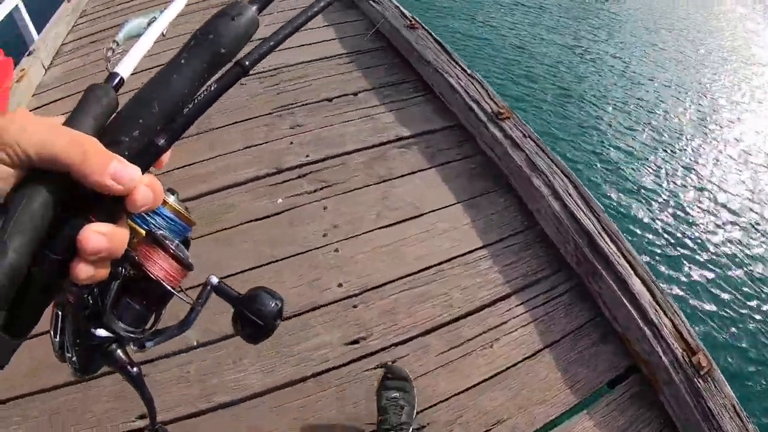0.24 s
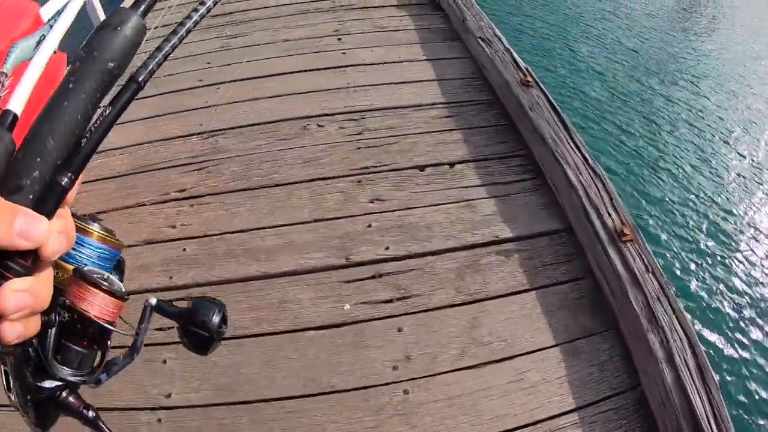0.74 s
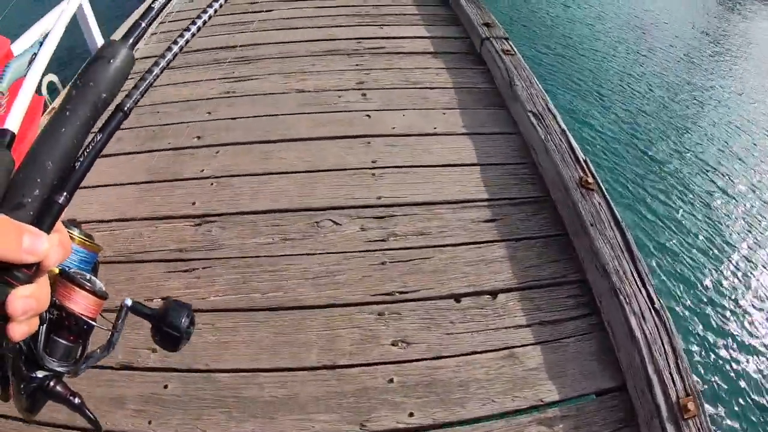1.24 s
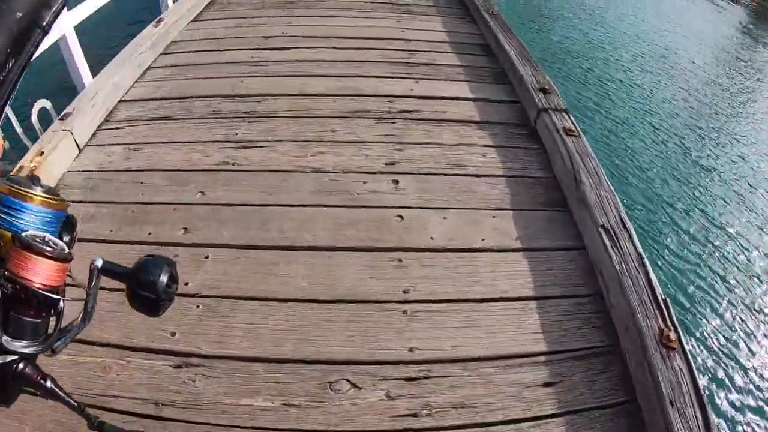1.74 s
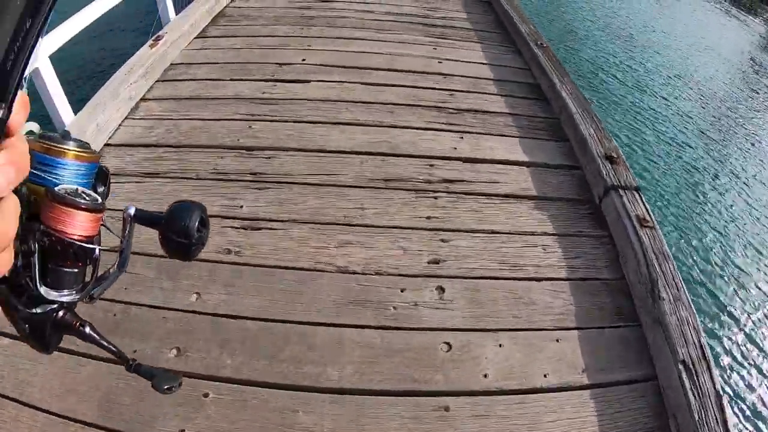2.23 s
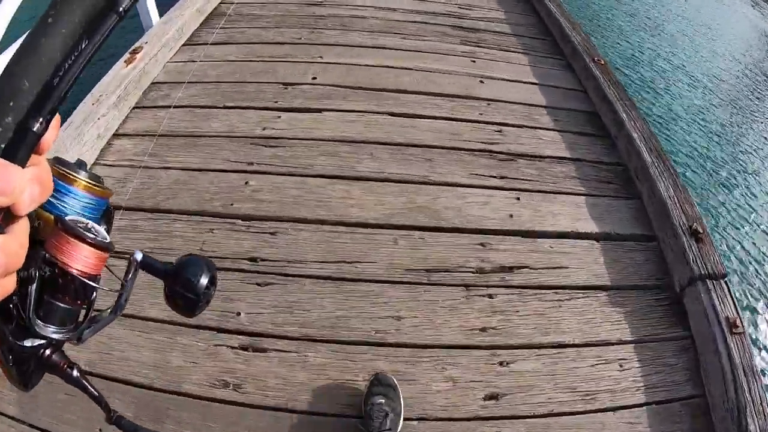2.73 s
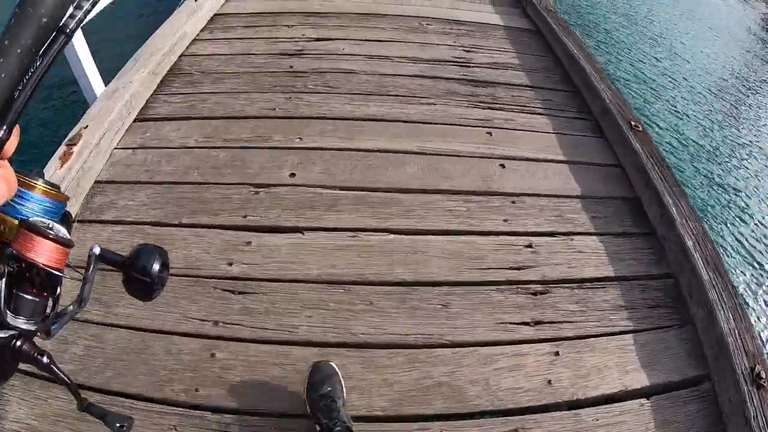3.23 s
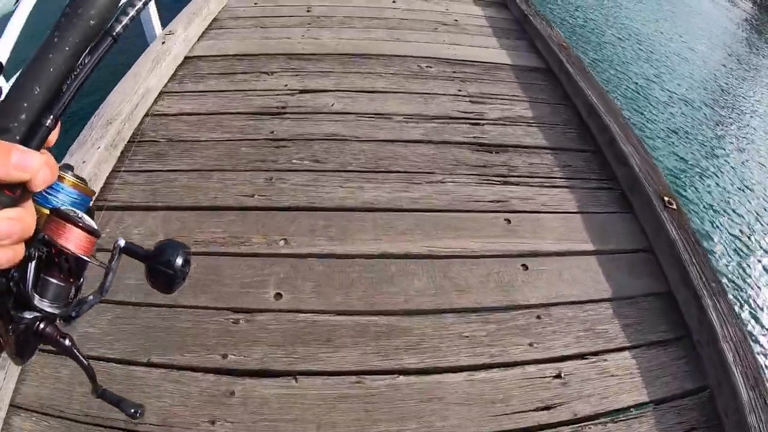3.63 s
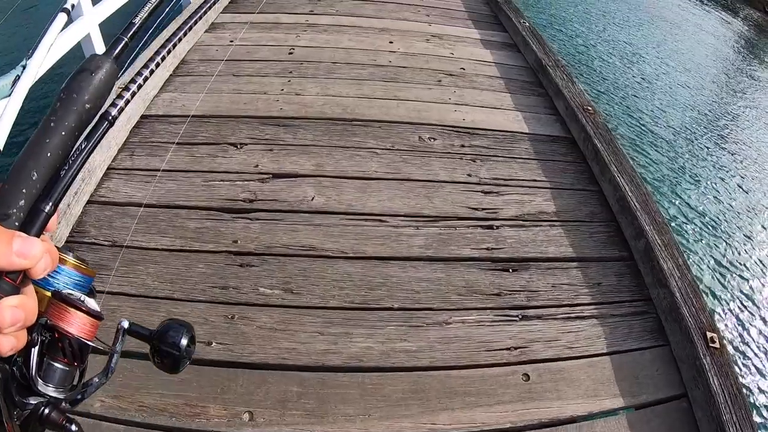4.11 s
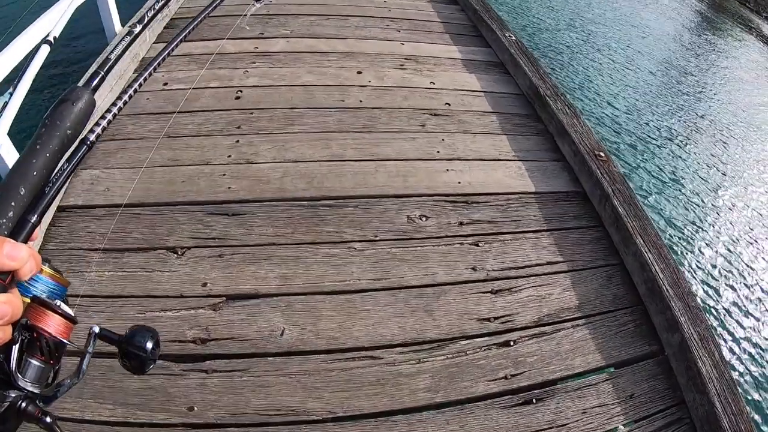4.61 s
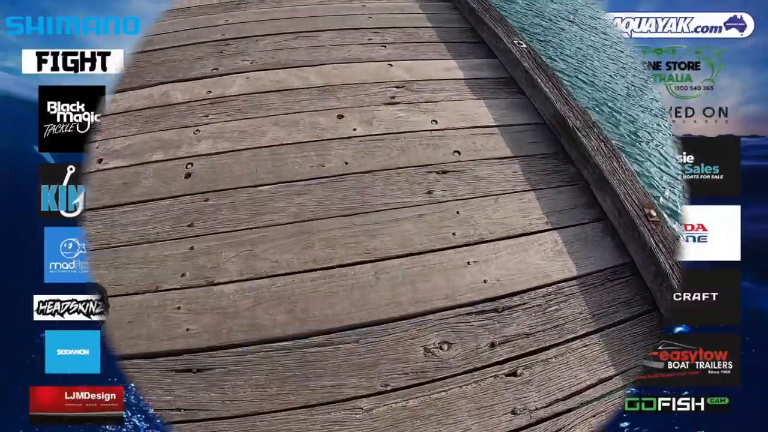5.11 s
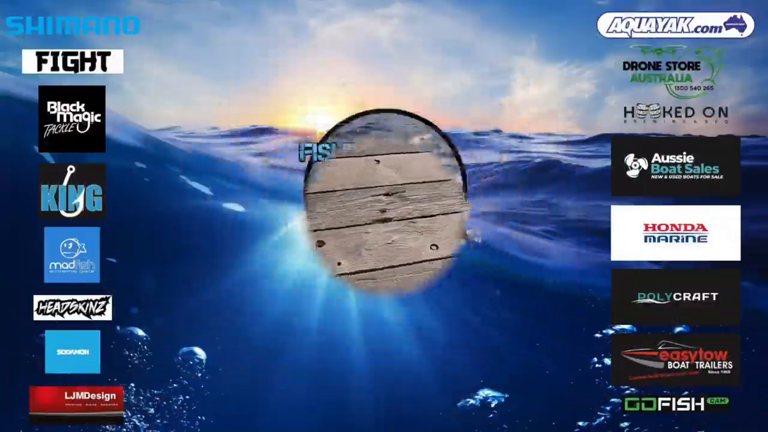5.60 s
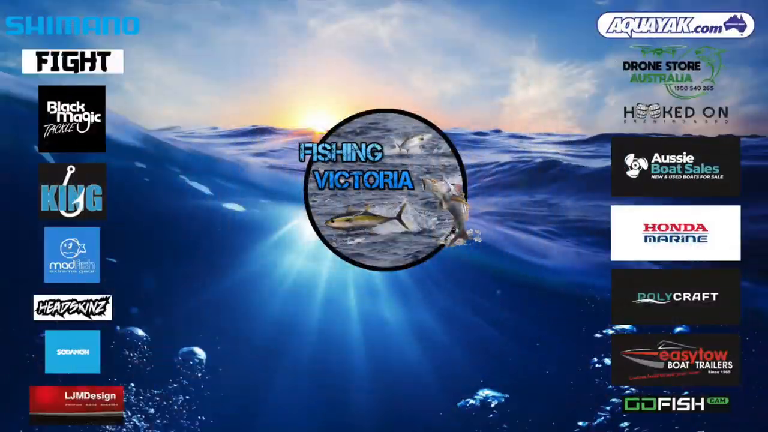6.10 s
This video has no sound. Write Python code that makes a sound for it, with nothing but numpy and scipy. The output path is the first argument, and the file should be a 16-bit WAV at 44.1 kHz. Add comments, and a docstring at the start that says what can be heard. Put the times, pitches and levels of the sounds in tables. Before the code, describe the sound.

Someone walks a wooden jetty: dull hollow knocks, rattling tackle, rubbing clothes and lumpy low wind, close to the body, fading at the end.

```python
"""Someone walks along a wooden jetty with rods and tackle, heard by two microphones worn on the body.
Steps and jolts thud as short deep swings of pressure and thump a hollow body, made of ringing sine waves.
Loose gear clacks and rattles as small blows ringing sets of modes; clothes rustle as coloured noise.
Wind buffets the microphones as lumpy low noise. The sound starts in stereo,
narrows to mono after the first second and fades out at the end."""
import sys
import numpy as np
from scipy import signal
from scipy.fft import rfft, irfft, next_fast_len
from scipy.io import wavfile
from scipy.ndimage import uniform_filter1d, minimum_filter1d, map_coordinates

SR = 44100
rng = np.random.default_rng(int(sys.argv[2]) if len(sys.argv) > 2 else 0)


def to_wav(sig):
    """Store sig (one row per channel, or 1-D mono) as 16-bit WAV at the path in sys.argv[1].

    Samples outside -1..1 are clipped; the rate is SR.
    """
    pcm = np.clip(np.atleast_2d(sig), -1, 1) * 32767
    pcm = np.round(pcm).astype(np.int16)
    wavfile.write(sys.argv[1], SR, pcm.T)  # frames by channels


N = 280035


def amp(db):
    """Turn dB into a gain."""
    return 10 ** (np.asarray(db) / 20)


def unit(x):
    """Scale a sound to an rms level of 1."""
    return x / np.sqrt(np.mean(x ** 2) + 1e-20)


def curves(rows):
    """Draw straight lines between table rows: one value per sample for each column after the time."""
    seconds, *columns = np.transpose(rows)
    return [np.interp(np.arange(N) / SR, seconds, column) for column in columns]


def wobble(rate):
    """Draw a smooth random curve through a given number of random points per second."""
    points = rng.standard_normal(int(N * rate / SR) + 4)
    return map_coordinates(points, [np.arange(N) * rate / SR])


def filtered(x, response):
    """Filter a sound: multiply its spectrum by a response that depends on frequency."""
    size = next_fast_len(N + SR // 2)
    spectrum = rfft(x, size) * response(np.fft.rfftfreq(size, 1 / SR))
    return irfft(spectrum, size)[..., :N]


def colour(points):
    """Make a gain curve over frequency from (Hz, dB) points on a log axis."""
    f, db = np.transpose(points)
    return lambda hz: amp(np.interp(np.log(hz + 1), np.log(f + 1), db))


def grit(response, grain_db, rate):
    """Make two separate noises that swell unevenly together, coloured, at rms 1."""
    grain = amp(grain_db * wobble(rate))
    return unit(filtered(grain * rng.standard_normal((2, N)), response))


def ports(pair, apart_db, lean):
    """Make left and right from a shared and an unshared part; a positive lean favours the left."""
    side = amp(apart_db) * pair[1] + lean * pair[0]
    return np.array([pair[0] + side, pair[0] - side])


def swells(steady_db, tops, tops_db, rise, fall):
    """Gain of a steady level plus swells, summed as powers; rise and fall are the seconds per 10 dB."""
    t = np.arange(N) / SR
    power = amp(steady_db) ** 2
    for s, db, up, down in np.broadcast(tops, tops_db, rise, fall):
        near = slice(max(0, round((s - 4 * up) * SR)), round((s + 4 * down) * SR))
        drop_db = 10 * np.maximum((s - t[near]) / up, (t[near] - s) / down)
        power[near] += amp(db - drop_db) ** 2
    return np.sqrt(power)


# Deep thuds. Each row: middle of the thud in seconds, level in dB, pitch in Hz.
THUD_HITS = [(0.276, -16.5, 81), (1.094, -11, 73.6), (1.682, -21.5, 81), (1.781, -20, 72),
             (1.834, -22, 112), (2.605, -26, 130), (2.649, -16, 132), (2.731, -14.5, 80.6),
             (2.876, -13, 66.4), (2.953, -14, 108), (3.29, -11.5, 86.4), (3.373, -12.5, 72),
             (3.467, -20, 80), (3.765, -18, 81.5), (3.863, -21, 75), (4.075, -13.5, 82),
             (4.235, -14.5, 114), (4.289, -15, 119), (4.387, -19, 75), (4.471, -17, 114),
             (4.648, -16, 88.7), (4.859, -14, 84), (5.259, -12.5, 110)]
THUD_SPREAD_S = 0.0067  # standard deviation of the bell-shaped swell


def thuds():
    """Soft heavy jolts travel through the body as a swing or two of deep pressure."""
    out = np.zeros(N + SR)
    t = np.arange(-SR // 20, SR // 20) / SR
    for s, db, hz in THUD_HITS:
        bell = np.exp(-.5 * (t / THUD_SPREAD_S) ** 2)
        swing = bell * np.sin(2 * np.pi * hz * t + rng.uniform(0, 2 * np.pi))
        out[round(s * SR) - SR // 20:][:len(t)] += amp(db) * swing
    return out[:N]


# Thumps on the hollow body.
# Each row: time in seconds, level in dB, pitch in Hz, time to die by 60 dB in seconds (held to 0.02-0.3).
THUMP_HITS = [(0.125, -25, 260, 0.053), (0.27, -19, 251, 0.088), (0.479, -12.5, 255, 0.092),
              (1.065, -4.5, 210, 0.025), (1.1, -10.5, 191, 0.08), (1.181, -17, 243, 0.059),
              (1.243, -10.5, 290, 0.038), (1.255, -13, 354, 0.061), (1.361, -16, 297, 0.076),
              (1.446, -16, 201, 0.063), (1.637, -9.5, 237, 0.063), (1.771, -18.5, 263, 0.1),
              (1.83, -5, 270, 0.055), (1.989, -14, 264, 0.093), (2.045, -15.5, 287, 0.13),
              (2.155, -9, 257.3, 0.096), (2.286, -3.5, 270, 0.04), (2.349, -14.5, 192.5, 0.11),
              (2.51, -19, 248, 0.15), (2.64, -11.5, 222, 0.045), (2.721, -17.5, 246, 0.11),
              (2.858, -12.5, 220.5, 0.13), (2.862, -8, 330, 0.054), (2.921, -9, 258, 0.065),
              (2.969, -13.5, 180.5, 0.15), (3.018, -21, 257, 0.032), (3.123, -27, 189, 0.032),
              (3.168, -20.5, 248, 0.2), (3.252, -5, 272, 0.021), (3.32, -12, 254, 0.11),
              (3.356, -13.5, 277, 0.058), (3.415, 0, 211, 0.069), (3.426, -5, 267, 0.057),
              (3.717, -11.5, 250, 0.076), (3.757, -4.5, 263, 0.057), (3.807, -20, 243, 0.093),
              (3.925, -4, 255, 0.024), (4.085, -9, 262, 0.093), (4.166, -18.5, 238, 0.097),
              (4.196, -13, 260, 0.087), (4.276, -10.5, 272, 0.034), (4.308, -8.5, 257, 0.043),
              (4.451, -7, 188, 0.034), (4.456, -15, 344, 0.045), (4.633, -9.5, 242.7, 0.12),
              (4.718, -11, 273, 0.038), (4.818, -10, 252, 0.084), (4.898, -12, 230, 0.089),
              (4.987, -9.5, 240, 0.053), (5.083, -5.5, 281, 0.028), (5.123, -8, 195, 0.072),
              (5.136, -9.5, 310, 0.026), (5.249, -10.5, 297, 0.043), (5.35, -11.5, 292, 0.035),
              (5.392, -13.5, 253, 0.16), (5.539, -11, 264, 0.056), (5.608, -8.5, 257, 0.11),
              (5.739, -4.5, 243, 0.04)]
# Steady hum of the hollow body. Each row: time in seconds, level in dB, favoured pitch in Hz.
HUM_LEVELS = [(0, -29, 194), (.4, -41, 190), (1.0, -45.5, 180), (1.08, -23, 190), (1.18, -23.5, 228),
              (1.3, -22.5, 308), (1.53, -45, 190), (1.73, -36.5, 210), (2.2, -33, 255), (2.38, -24, 189),
              (2.58, -25.5, 150), (2.78, -21, 177), (2.83, -39, 233.3), (2.9, -23, 300), (3.08, -24, 188),
              (3.22, -39.5, 198.6), (3.4, -30, 288), (3.6, -29.5, 203), (4.0, -42.5, 215),
              (4.43, -32.5, 186), (4.7, -31.5, 197), (5.14, -32.5, 300), (5.3, -42.5, 200),
              (5.77, -29, 228)]
# Resonances of the hollow body. Each row: pitch in Hz, width in Hz of each of two filter passes.
HOLLOW_MODES = [(150, 73), (200, 69), (258, 51), (330, 79), (420, 140), (550, 150)]
THUMP_RISE_S, THUMP_HEADROOM_DB = 0.0037, 2.5  # soft start, and extra level for what it loses
AFTERHUM_DB, AFTERHUM_S = -16.5, 0.024  # hum after a thump: level against the thump, time to fall 10 dB


def hollow_mode(centre, width):
    """Noise through one resonance of the body, twice over, so it hums around one pitch."""
    def response(f):
        return (1j * f * width / (centre ** 2 - f ** 2 + 1j * f * width)) ** 2
    return grit(response, grain_db=5.0, rate=29)


def hollow():
    """Thumps ring the hollow body as dying sine waves; its resonances hum as noise in narrow bands."""
    out = np.zeros(N + SR)
    t = np.arange(SR // 4) / SR
    for s, db, hz, t60 in THUMP_HITS:
        decay_db = -60 * t / np.clip(t60, .02, .3)
        swell = (1 - np.exp(-t / THUMP_RISE_S)) * amp(db + THUMP_HEADROOM_DB + decay_db)
        main = np.sin(2 * np.pi * hz * t)
        # a deeper mode beats with the main one
        below = amp(-11.0) * np.sin(2 * np.pi * 0.63 * hz * t + rng.uniform(0, 2 * np.pi))
        # a higher mode dies sooner
        above = amp(-14.5 - 60 * t / 0.031) * np.sin(2 * np.pi * 1.85 * hz * t + rng.uniform(0, 2 * np.pi))
        thump = rng.choice([-1, 1]) * swell * (main + below + above)
        out[round((s - .0014) * SR):][:len(t)] += thump

    hum_db, favoured_hz = curves(HUM_LEVELS)
    tops, tops_db = np.transpose(THUMP_HITS)[:2]
    hum_gain = swells(hum_db, tops + 0.011, tops_db + AFTERHUM_DB, 0.0016, AFTERHUM_S)
    # modes near the favoured pitch take most of the hum
    shares = np.array([np.exp(-(np.log(hz / favoured_hz) / 0.31) ** 2) + 0.19 for hz, _ in HOLLOW_MODES])
    shares = shares / np.linalg.norm(shares, axis=0)
    hum = sum(share * hollow_mode(hz, width) for share, (hz, width) in zip(shares, HOLLOW_MODES))
    return ports(hum_gain * hum, apart_db=-21.5, lean=0.018) + out[:N]


FIRST_BLOW_DB = 8  # first contact, against the chatter noise before its decay
MODE_SCATTER_DB = 3  # random spread of mode levels


def ringing(modes, favoured_hz, t60):
    """A firm blow and dying chatter ring modes, most near a pitch; shared part peaks at 1, unshared differs."""
    t = np.arange(SR // 14) / SR
    chatter = (1 - np.exp(-t / 0.00099)) * amp(-60 * t / np.clip(t60, .005, .2))
    chatter = chatter * (1 + 1.3 * np.exp(-t / 0.0011))  # stronger just after the blow
    blows = chatter * rng.standard_normal((2, len(t)))
    blows[:, 0] = amp(FIRST_BLOW_DB)
    ring = 0
    for hz, db, life in modes:
        near_db = -9 * abs(np.log2(hz / favoured_hz))
        scatter_db = rng.normal(0, MODE_SCATTER_DB, (2, 1))
        tone = np.sin(2 * np.pi * hz * rng.normal(1, 0.034) * t)
        ring = ring + amp(db + near_db + scatter_db - 60 * t / life) * tone
    sound = signal.fftconvolve(blows, ring, axes=1)[:, :len(t)]
    return sound / np.abs(sound[0]).max()


CONTACT_SPREAD_DB = 4  # scale of the random sizes of the contacts
SCRATCH_S, CONTACT_RING_S = .05, .03  # times to die by 60 dB
CONTACT_RING_DB = -7  # ring against scratch


def crunch(spectrum, modes, rate, smooth):
    """Scattered tiny contacts each ring one mode and scratch briefly, over smooth noise; rms 1."""
    t = np.arange(SR // 25) / SR
    colouring = colour(spectrum)
    contacts = rng.random(N) < rate / SR  # rate is contacts per second
    sizes = contacts * amp(CONTACT_SPREAD_DB * np.minimum(rng.exponential(size=N), 2))
    scratch = signal.oaconvolve(sizes, amp(-60 * t / SCRATCH_S))[:N]
    noise = unit(filtered((smooth + unit(scratch)) * rng.standard_normal((2, N)), colouring))
    which = rng.integers(len(modes), size=N)
    ring_shape = amp(-60 * t / CONTACT_RING_S) * (1 - np.exp(-t / 0.0017))
    rings = 0
    for k, (hz, *_) in enumerate(modes):  # only the pitch of each mode is used here
        tone = ring_shape * np.sin(2 * np.pi * hz * t)
        rings = rings + colouring(hz) * signal.oaconvolve(sizes * (which == k), tone)[:N]
    return unit(noise + amp(CONTACT_RING_DB) * unit(rings))


# Clacks of the gear, before soft contacts dull them. Each row: time in seconds, peak of the dull modes
# in dB, peak of the sharp modes against the dull in dB, pitch favoured by the dull modes in Hz.
CLACK_HITS = [(.183, -16.5, -9, 790), (.265, -20, -20, 1000), (.305, -28.5, -7, 800),
              (0.399, -32, -16, 800), (.43, -32, -11, 800), (.477, -19.5, -14, 790),
              (.521, -21, -11.5, 800), (.547, -24.5, -17, 795), (.666, -24.5, -8.5, 541),
              (.823, -26.5, -9, 1180), (.839, -29, -4, 834), (1.063, -10.5, -19, 696),
              (1.074, -24, -12.5, 650), (1.086, -24, -11, 795), (1.099, -22.5, -12, 557),
              (1.15, -28, -6, 834), (1.21, -23, -10.5, 595), (1.229, -19.5, -9, 1200),
              (1.239, -13, -18, 750), (1.254, -22, -19, 1000), (1.264, -19.5, -27.5, 700),
              (1.298, -22, -33, 800), (1.306, -23.5, -33, 900), (1.352, -31, -22, 800),
              (1.446, -24.5, -6, 778), (1.497, -31, -20, 816), (1.628, -16.5, -15.5, 726),
              (1.68, -15.5, -28, 586), (1.714, -21.5, -12, 649), (1.766, -17, -20, 649),
              (1.827, -13, -17.5, 800), (1.834, -14.5, -23, 600), (1.852, -25.5, -5, 1120),
              (1.872, -26.5, -8.5, 1000), (1.928, -39, -14, 900), (1.983, -18.5, -9.5, 573),
              (2.044, -19, -6.5, 730), (2.098, -25, -7.5, 900), (2.153, -17, -24.5, 530),
              (2.278, -23, -21.5, 522), (2.335, -24, -20.5, 630), (2.388, -25, -7, 533),
              (2.487, -24.5, -15.5, 606), (2.509, -16.5, -12.5, 1110), (2.522, -19.5, -8.5, 1300),
              (2.542, -27, -5.5, 1300), (2.634, -18, -9, 727), (2.66, -25, -12, 800),
              (2.671, -20.5, -15, 700), (2.689, -20, -19.5, 890), (2.729, -22, -10, 600),
              (2.754, -23, -9, 1100), (2.777, -20, -23, 600), (2.856, -19, -16, 900),
              (2.912, -17.5, -19, 800), (2.929, -21.5, -14, 900), (2.954, -24.5, -20, 900),
              (3.008, -20.5, -18, 567), (3.063, -22.5, -9, 1130), (3.11, -35, -12, 800),
              (3.23, -21.5, -12, 910), (3.239, -25.5, -2, 860), (3.277, -25, -5, 751),
              (3.318, -20.5, -13, 799), (3.363, -21, -17, 550), (3.411, -17, -12.5, 1180),
              (3.471, -23.5, -14, 536), (3.543, -23, -23, 520), (3.584, -29, -18, 900),
              (3.612, -35.5, -2.5, 1250), (3.711, -29, -19, 1100), (3.755, -31, -4.5, 900),
              (3.784, -19.5, -12, 846), (3.806, -27.5, -5, 1250), (3.914, -32, -16, 900),
              (3.958, -25, -14, 1150), (4.011, -26.5, -14, 820), (4.031, -34, -4, 900),
              (4.08, -34, -3.5, 704), (4.116, -29, -12, 990), (4.133, -24.5, -9.5, 527),
              (4.18, -20, -16.5, 573), (4.212, -28.5, -4.5, 1200), (4.24, -33, -3, 1110),
              (4.3, -25, -22, 736), (4.404, -33, -18, 700), (4.443, -25, -13.5, 710),
              (4.455, -28, -18.5, 800), (4.492, -24, -4.5, 568), (4.516, -19, -13.5, 1250),
              (4.528, -32, -12.5, 900), (4.632, -29, -7, 560), (4.65, -24.5, -13, 786),
              (4.685, -28, -5, 651), (4.698, -26.5, -8.5, 1110), (4.716, -29, -6, 700),
              (4.731, -30, -11, 1350), (4.842, -21, -19, 900), (4.856, -21.5, -14, 1150),
              (4.886, -27, -5.5, 662), (4.912, -13.5, -16.5, 895), (4.93, -18, -13, 895),
              (4.951, -37, -14, 1000), (4.981, -23.5, -12, 900), (5.059, -31, -21.5, 790),
              (5.084, -27, -16.5, 554), (5.122, -24.5, -28, 527), (5.233, -24, -14.5, 703),
              (5.254, -18.5, -12.5, 744), (5.348, -15, -18.5, 750), (5.39, -15.5, -15, 650),
              (5.419, -21.5, -16, 560), (5.538, -15, -17, 710), (5.592, -17.5, -11.5, 678),
              (5.635, -21, -23, 773), (5.694, -28, -14, 670), (5.745, -18, -12, 600)]
# Hard little parts touching. Each row: time in seconds, peak in dB before the same dulling.
CLICK_HITS = [(0.1412, -30), (0.183, -37), (0.291, -24.5), (0.374, -36), (0.4837, -42), (0.5006, -31),
              (0.6628, -28.5), (0.705, -36), (0.876, -24.5), (0.905, -25), (1.1172, -26), (1.1429, -26),
              (1.2302, -24), (1.447, -41), (1.6326, -36), (1.683, -37), (1.7677, -40), (1.791, -29.5),
              (1.8229, -31), (1.9853, -37), (2.5118, -34), (2.5194, -23), (2.635, -40), (2.7234, -38),
              (2.7394, -28), (2.83, -39), (2.88, -35), (2.99, -35), (3.0679, -36), (3.2087, -30),
              (3.238, -31), (3.3008, -30), (3.4153, -34.5), (3.487, -36), (3.7728, -26.5), (3.875, -34),
              (4.2328, -33), (4.493, -36), (4.6027, -35.5), (4.649, -35), (4.8562, -28.5), (4.8688, -27.5),
              (4.8988, -30), (4.9143, -30), (4.9496, -27), (5.01, -25.5), (5.104, -32.5),]
# Low, high and hard-part modes of the gear.
# Each row: middle pitch in Hz, relative level in dB, time to die by 60 dB in seconds.
DULL_MODES = [(490, 3.5, 0.015), (625, -0.5, 0.017), (753, -1.5, 0.021), (913, -1.5, 0.014),
              (1130, -2.5, 0.022), (1220, -6.5, 0.0058)]
SHARP_MODES = [(1405, 2, 0.0062), (1613, 0.5, 0.01), (2010, -3, 0.0062), (2290, -2, 0.016),
               (3005, 1, 0.016), (3700, -10.5, .007)]
HARD_MODES = [(2330, 2, 0.028), (2600, -8, 0.006), (3050, -7, 0.01), (3670, -8, 0.014)]
# Steady rattle of small gear. Each row: time in seconds, dull level in dB, sharp level in dB.
RATTLE_LEVELS = [(0, -43.5, -54.5), (.5, -45.5, -52.5), (1.0, -44, -55), (1.2, -40.5, -57.5),
                 (1.5, -37.5, -50), (1.8, -36, -48.5), (1.95, -39.5, -55), (2.2, -39, -51.5),
                 (2.6, -48, -53), (2.9, -35, -48.5), (3.2, -43, -56), (3.4, -47, -48.5),
                 (3.68, -47.5, -61.5), (4.1, -40.5, -53.5), (4.4, -44, -57), (4.9, -43.5, -54.5),
                 (5.18, -45, -59.5), (5.5, -50, -53), (5.85, -40.5, -55)]
# Colour of the dull and the sharp rattle. Each row: frequency in Hz, relative level in dB.
DULL_COLOUR = [(220, -27.5), (380, 2.5), (426, -2), (740, -8), (1030, -12.5), (1130, -11), (1380, -26),
               (1500, -20), (1950, -47.5), (3300, -120)]
SHARP_COLOUR = [(760, -29), (1300, 1), (1560, 0), (1780, -0.5), (2320, -5), (2760, -22), (3100, -14),
                (3300, -24), (4290, -42), (7260, -120)]
# chatter dies by 60 dB in this time after a -20 dB clack; louder clacks by this power of their size
CHATTER_S, CHATTER_GROWS = 0.06, 0.37
CLACK_DELAY_S = .0003  # small delay added to every clack time
AFTERRATTLE_DB, AFTERRATTLE_SHARP_DB = -16.5, -13  # rattle after a clack, against the peak of its modes
RATTLE_RISE_S, AFTERRATTLE_S = .004, 0.036  # times to rise the last 10 dB and to fall 10 dB


def gear():
    """Clacks ring dull and sharp modes, clicks ring hard little parts, and the tackle keeps rattling."""
    out = np.zeros((2, N + SR))
    for s, db, sharp_db, hz in CLACK_HITS:
        t60 = CHATTER_S * amp(CHATTER_GROWS * (db + 20.0))
        clack = ringing(DULL_MODES, hz, t60) + amp(sharp_db) * ringing(SHARP_MODES, 2200, t60)
        out[:, round((s + CLACK_DELAY_S) * SR):][:, :SR // 14] += amp(db) * clack
    for s, db in CLICK_HITS:
        out[:, round(s * SR):][:, :SR // 14] += amp(db) * ringing(HARD_MODES, 2900, 0.0099)
    # soft contacts carry little treble
    hits = filtered(out[:, :N], lambda hz: 1 / (1 + 1j * hz / 4500) ** 4)

    dull_db, sharp_db = curves(RATTLE_LEVELS)
    tops, tops_db, edge_db = np.transpose(CLACK_HITS)[:3]
    tops = tops + 0.0045
    shake = amp(1.2 * wobble(30))
    dull_gain = shake * swells(dull_db, tops, tops_db + AFTERRATTLE_DB, RATTLE_RISE_S, AFTERRATTLE_S)
    sharp_tops_db = tops_db + edge_db + AFTERRATTLE_SHARP_DB
    sharp_gain = shake * swells(sharp_db, tops, sharp_tops_db, RATTLE_RISE_S, AFTERRATTLE_S)
    dull = dull_gain * crunch(DULL_COLOUR, DULL_MODES, rate=170, smooth=0.77)
    sharp = sharp_gain * crunch(SHARP_COLOUR, SHARP_MODES[:4], rate=220, smooth=0.97)
    return ports(hits + dull + sharp, apart_db=-5.5, lean=-.25)


# Steady rubbing of cloth. Each row: time in seconds, level in dB, high sheen level in dB.
RUB_LEVELS = [(0.0, -58.5, -68.5), (0.73, -58.5, -73), (1.06, -57, -75), (1.33, -60.5, -80.5),
              (1.7, -54.5, -74), (2.17, -53.5, -75), (2.56, -53, -75.5), (2.7, -53, -74),
              (2.81, -49.5, -68.5), (3.02, -57.5, -79.5), (3.31, -56.5, -78.5), (3.57, -60, -80.5),
              (3.72, -59, -80.5), (3.93, -56.5, -73.5), (4.13, -55, -77), (4.31, -58, -82),
              (4.84, -56.5, -83), (5.01, -56, -79.5), (5.33, -66.5, -85.5), (5.45, -65, -87)]
# Harder strokes of cloth. Each row: time of the top in seconds, level in dB, high sheen level in dB,
# time to fall 10 dB in milliseconds (held to 8-300; the sheen falls a little sooner).
CLOTH_STROKES = [(.05, -56.5, -70, 201), (.155, -52, -61.5, 30), (.187, -49.5, -65.5, 22),
                 (.3, -51.5, -65, 69), (.5, -52, -64, 59), (.88, -54, -63, 30), (.91, -57, -63, 36),
                 (1.07, -48, -63, 53), (1.118, -51, -63.5, 25.5), (1.15, -55, -71.5, 40.5),
                 (1.235, -44.5, -63.5, 22), (1.26, -53, -66, 23), (1.37, -49, -69, 41),
                 (1.453, -46.5, -67, 26), (1.48, -48, -70.5, 31), (1.575, -49.5, -71.5, 33),
                 (1.684, -46, -66, 120), (1.83, -47, -65, 49), (1.988, -50, -71, 63),
                 (2.05, -52, -72.5, 119), (2.22, -65, -78.5, 149), (2.515, -40.5, -61, 18),
                 (2.64, -46, -66, 121), (2.77, -58, -68, 151), (2.88, -46.5, -63.5, 66),
                 (3.01, -59, -75, 30), (3.07, -52, -73, 39), (3.21, -63, -78, 19), (3.24, -54, -72.5, 49.5),
                 (3.31, -51, -68.5, 50), (3.365, -53, -68.5, 38), (3.42, -48.5, -66.5, 58),
                 (3.615, -54, -67.5, 11), (3.72, -56.5, -75.5, 28), (3.771, -48.5, -65, 80.5),
                 (3.89, -53, -71, 14), (3.953, -50, -71, 15), (4.232, -50, -71.5, 42.5),
                 (4.86, -47, -66, 67), (4.92, -53, -73, 50), (4.955, -49.5, -70.5, 50),
                 (5.05, -56, -67, 30.5), (5.09, -52, -72.5, 59), (5.255, -60, -73.5, 32),
                 (5.278, -47, -73, 27), (5.3, -50, -76, 13), (5.365, -47.5, -69.5, 58),
                 (5.418, -49.5, -66.5, 46), (5.485, -56, -73, 8), (5.56, -49, -73, 40),
                 (5.59, -53.5, -78, 50), (5.66, -52, -80, 42), (5.75, -50, -77, 50)]
# Colour of the rubbing and of its sheen. Each row: frequency in Hz, relative level in dB.
CLOTH_COLOUR = [(1470, -9), (2500, 0), (2780, -3), (3100, -5), (3370, -3.5), (4800, -9), (5500, -13),
                (6000, -24), (7500, -36.5), (9750, -55.5), (16500, -120)]
SHEEN_COLOUR = [(3530, -27.5), (6000, -3), (8210, -7.5), (10200, -19), (11000, -21), (12100, -30.5),
                (13100, -33), (14600, -36.5)]
STROKE_RISE_S, SHEEN_RISE_S = 0.015, 0.01  # times to rise the last 10 dB
SHEEN_BRIEF = 0.94  # the sheen falls in this share of the stroke's time


def clothes():
    """Cloth and straps rub near the microphones as coloured noise; harder strokes add a high sheen."""
    rub_db, sheen_db = curves(RUB_LEVELS)
    tops, tops_db, shine_db, falls_ms = np.transpose(CLOTH_STROKES)
    falls = np.clip(falls_ms, 8, 300) / 1000
    stroke = amp(0.88 * wobble(40))
    rub_gain = stroke * swells(rub_db, tops, tops_db, STROKE_RISE_S, falls)
    sheen_gain = stroke * swells(sheen_db, tops, shine_db, SHEEN_RISE_S, SHEEN_BRIEF * falls)
    rub = rub_gain * grit(colour(CLOTH_COLOUR), grain_db=1.0, rate=240)
    sheen = sheen_gain * grit(colour(SHEEN_COLOUR), grain_db=3, rate=130)
    return ports(rub, apart_db=-5.5, lean=-.2) + ports(sheen, apart_db=3.0, lean=-.2)


# Steady wind on both sides. Each row: time in seconds, level in dB.
WIND_LEVELS = [(0, -31), (.3, -30.5), (.65, -29.5), (1.04, -30.5), (1.5, -28.5), (1.75, -36), (2.2, -32.5),
               (2.43, -38.5), (2.6, -26.5), (3.1, -28.5), (3.5, -25.5), (3.7, -31.5), (3.95, -26.5),
               (4.4, -29), (4.7, -27), (4.95, -27), (5.35, -28), (5.85, -29)]
# Single shoves of wind. Each row: time of the top in seconds, level in dB,
# time to fall 10 dB in seconds (held to 0.01-0.5, so a negative number means 0.01).
WIND_SHOVES = [(.18, -23, 0.1), (1.22, -17, -0.07), (1.681, -22, 0.04), (1.87, -27, 0.3),
               (2.51, -28.5, 1.5), (2.75, -23.5, -0.4), (3.37, -23.5, 0.1), (3.8, -28, 0.5),
               (4.072, -27.5, 0.2), (4.511, -21.5, -0.44), (4.87, -20, -0.15), (5.38, -23, 0.05)]
# Wind on the left microphone alone. Each row: time in seconds, level in dB.
LEFT_LEVELS = [(0, -31), (.2, -30), (.3, -21.5), (.57, -25), (.62, -16), (.8, -25.5), (1.04, -19),
               (1.08, -38), (1.25, -24), (1.8, -26.5), (2.1, -60.5)]
# Colour of the wind on both sides and on the left alone. Each row: frequency in Hz, relative level in dB.
WIND_COLOUR = [(12, -40), (20, -4.5), (70, 5), (150, 2), (253, -7.5), (300, -2), (390, -18), (650, -31),
               (1400, -120)]
LEFT_COLOUR = [(12, -33), (25, 1), (70, 5.5), (160, -2), (230, -7.5), (400, -32.5), (800, -120)]
BUFFET_RISE_S = 0.036  # to rise the last 10 dB


def wind():
    """Eddies push on both microphones in lumps of low noise; gusts from the water hit the left alone."""
    tops, tops_db, falls = np.transpose(WIND_SHOVES)
    gain = swells(curves(WIND_LEVELS)[0], tops, tops_db, BUFFET_RISE_S, np.clip(falls, .01, .5))
    both = gain * grit(colour(WIND_COLOUR), grain_db=1.0, rate=30)
    left = amp(curves(LEFT_LEVELS)[0]) * grit(colour(LEFT_COLOUR), grain_db=1.5, rate=22)[0]
    return ports(both, apart_db=-13.5, lean=.1) + [left, 0 * left]


def scene():
    """Add up everything that reaches the two microphones."""
    return thuds() + hollow() + gear() + clothes() + wind()


# Stereo width. Each row: time in seconds, gain of the left-right difference in dB.
STEREO_WIDTH = [(0, -4), (.15, -1), (.95, 1), (1.05, -3), (1.35, -10.5), (1.65, -31), (1.8, -37.5),
                (1.9, -79.5), (6.35, -84)]
# Fade at the end. Each row: time in seconds, gain in dB before the limiter.
END_FADE = [(5.2, 1), (5.5, -5), (5.7, -18), (5.8, -32), (5.86, -64), (5.9, -110)]
TOP_HZ = 14800  # nothing is kept from here up


def record(dry):
    """Narrow the stereo to mono, fade out, hold down the peaks with a limiter and cut the top treble."""
    mid = dry.mean(0)
    side = amp(curves(STEREO_WIDTH)[0]) * (dry[0] - dry[1]) / 2
    pair = amp(curves(END_FADE)[0]) * np.array([mid + side, mid - side])
    needed_gain = np.minimum(1, .6 / (np.abs(pair).max(0) + 1e-9))
    # hold the lowest gain around each peak, then smooth it
    squeeze = uniform_filter1d(minimum_filter1d(needed_gain, size=441), size=220)
    return filtered(pair * squeeze, lambda hz: hz < TOP_HZ)


dry = scene()
out = record(dry)
to_wav(out)
```